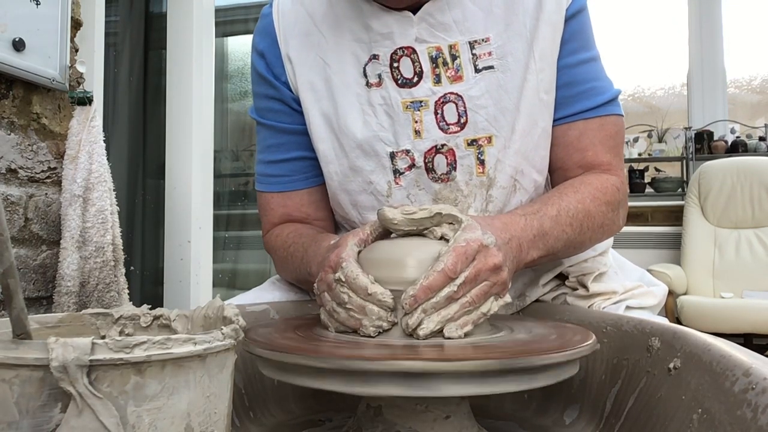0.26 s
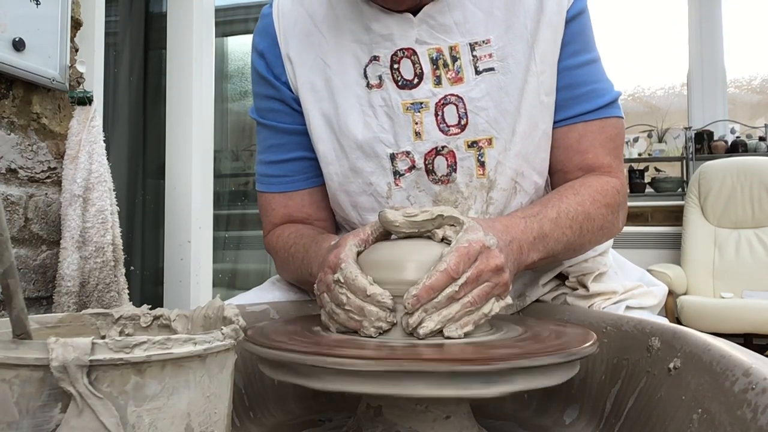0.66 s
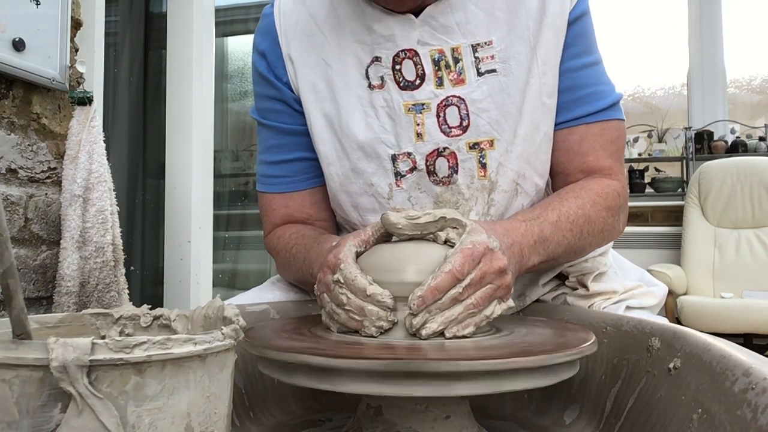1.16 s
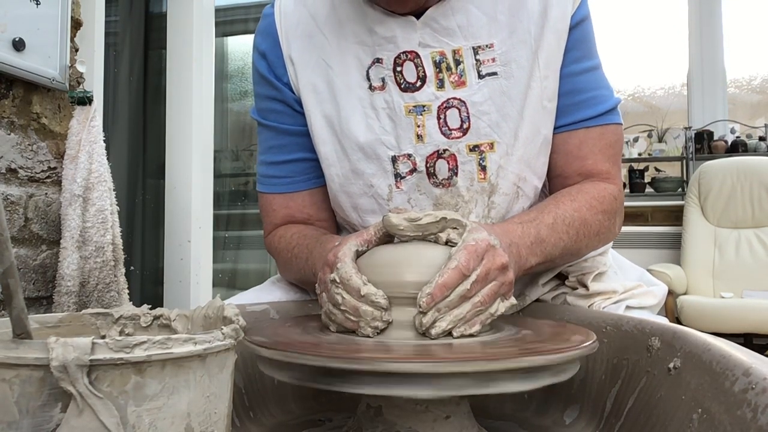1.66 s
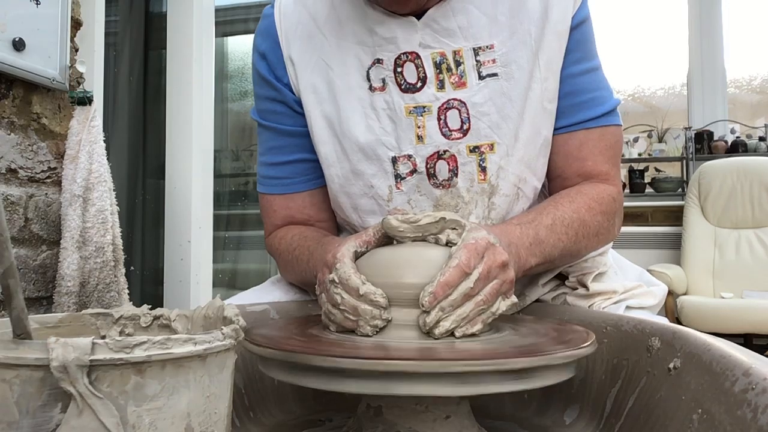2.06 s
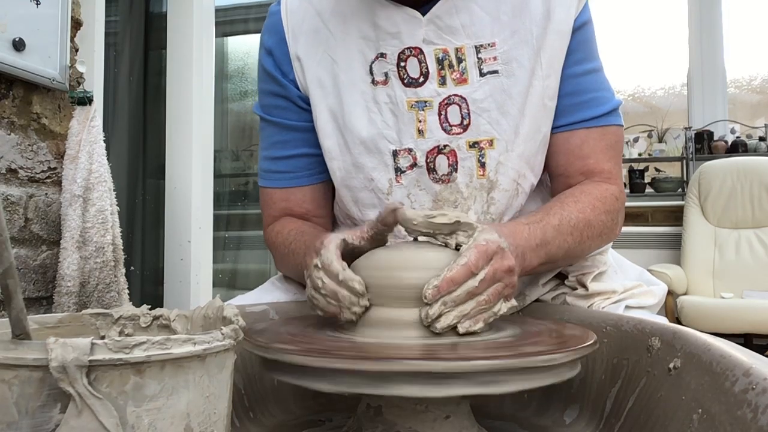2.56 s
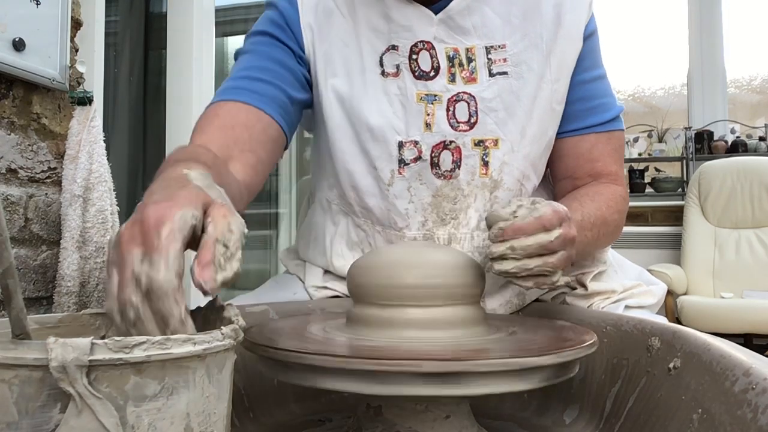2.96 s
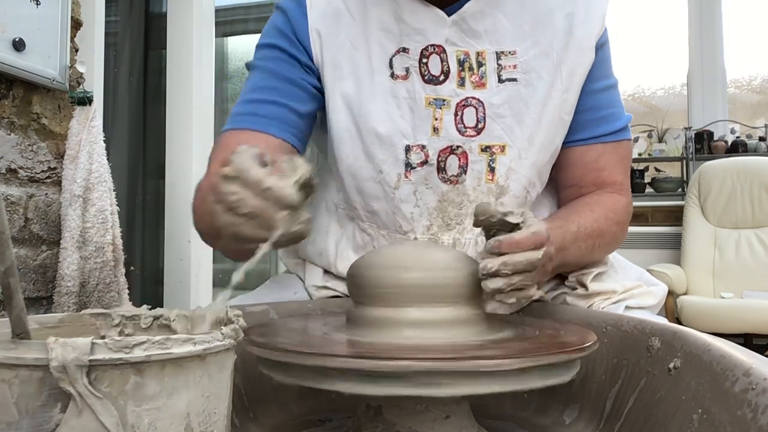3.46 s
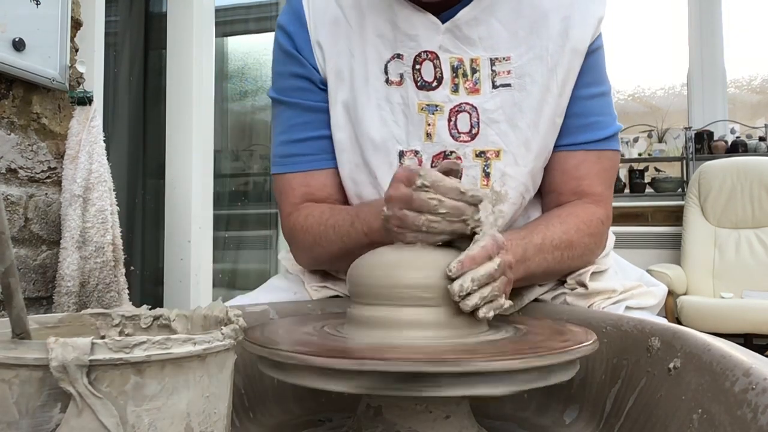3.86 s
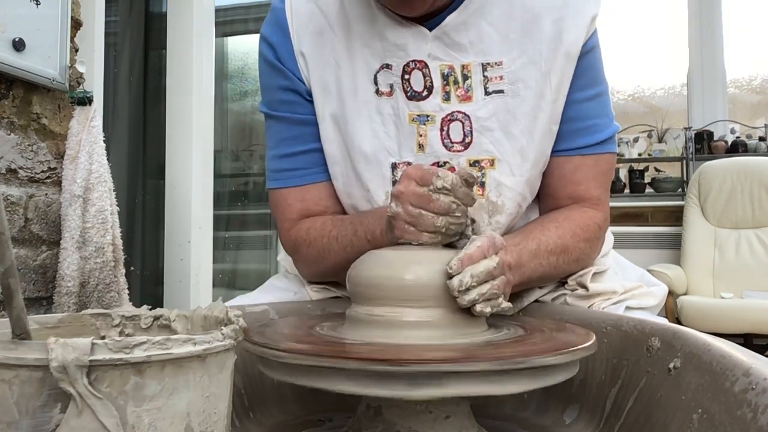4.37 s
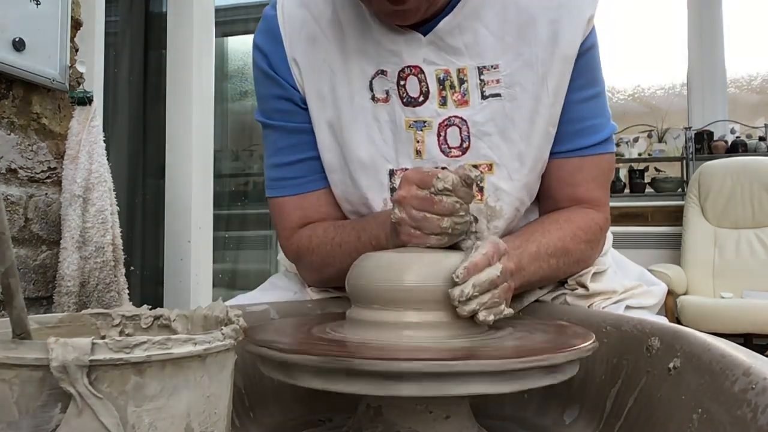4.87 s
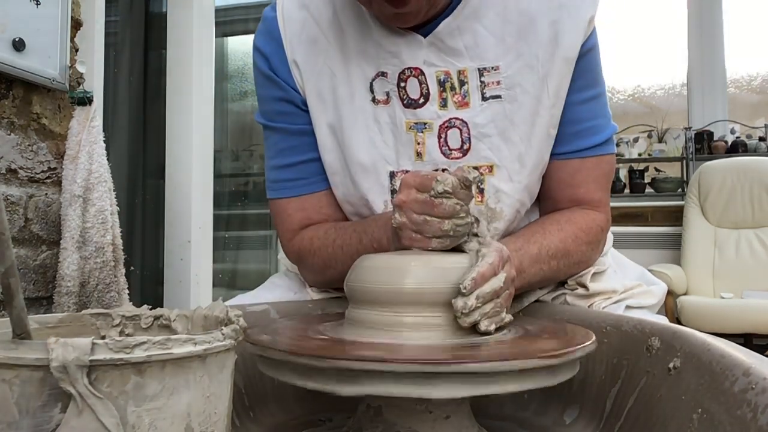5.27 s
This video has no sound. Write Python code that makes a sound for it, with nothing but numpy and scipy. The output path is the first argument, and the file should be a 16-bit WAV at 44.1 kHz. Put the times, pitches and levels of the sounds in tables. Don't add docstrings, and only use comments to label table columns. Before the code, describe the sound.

For about 5.5 seconds an electric potter's wheel runs close to the microphone, in a dry mono pickup. A strong low hum near 100 and 170 hertz, with a weaker 200 hertz tone, stays almost constant, roughened by shaft vibration about eleven times a second; its speed sags imperceptibly around 2 seconds and recovers. Above it sit soft rumble, a faint metallic bearing whir and thin air hiss. From 0.2 to 1.5 seconds, wet clay drags past the palms in five quiet, gritty hisses, roughly 0.3 seconds apart. The rub then settles and fades as one hand leaves near 2.65. At 3.02 a tiny hard flick of slip snaps against the bucket, followed around 3.4 by a brief soft water swish with small ticks. Sparse wet ticks resume at 4.4, thickening after 5 seconds as the light, steady clay hiss returns, the motor still droning at the end.

```python
import sys
import numpy as np
from scipy import signal
from scipy.fft import rfft, irfft, next_fast_len
from scipy.io import wavfile

SR = 44100
rng = np.random.default_rng(int(sys.argv[2]) if len(sys.argv) > 2 else 0)


def to_wav(s):
    ch = np.atleast_2d(s).T
    pcm = np.round(np.clip(ch, -1, 1) * 32767)
    wavfile.write(sys.argv[1], SR, pcm.astype(np.int16))


def attenuation_scalar(level_db):
    decades = np.asarray(level_db, float) / 20
    return 10 ** decades


N = 243873

# time_s, turns_per_s
SHAFT_SPEED = [(0, 10.768), (0.5, 10.766), (1.0, 10.734), (2.0, 10.7), (2.25, 10.709), (2.75, 10.82),
               (3.5, 10.833), (4.0, 10.82), (4.3, 10.795), (5.0, 10.774), (5.53, 10.786)]


def shaft_turns():
    start_turns = .75
    return np.cumsum(in_time(SHAFT_SPEED)) / SR + start_turns


# multiple_of_shaft_speed, level_db (rms)
STRONG_ORDERS = [(6, -58.4), (8, -53.5), (9, -42.6), (10, -43.7), (11, -39.5), (12, -44.5), (13, -49.5),
                 (14, -46.7), (15, -39.7), (16, -27.9), (17, -43.1), (18, -40.6), (19, -50.5), (20, -57.4),
                 (21, -54.0), (22, -43.5), (24, -42.9), (25, -40.9), (26, -54.5), (27, -58.9), (30, -49.6),
                 (31, -52.0), (32, -56.5), (33, -49.5), (34, -59.9), (36, -55.6), (39, -54.8), (41, -56.0),
                 (42, -61.9), (48, -65.1)]


def shaft_orders():
    faint_db, fall_db_per_order = -62, .6
    strong = dict(STRONG_ORDERS)
    return [(k, strong.get(k, faint_db - fall_db_per_order * abs(k - 30))) for k in range(5, 57)]


# multiple_of_twice_mains, level_db (rms)
HUM = [(1, -30.8), (2, -36.3), (3, -55.2), (4, -58.9), (5, -67.2), (6, -71.6)]
# multiple_of_twice_mains, level_db (rms)
WHINE = [(6, -77.5), (26, -81.5), (29, -78)]
# shaft_multiples_from_first_hum_line, level_db (rms)
BESIDE_FIRST_HUM = [(1, -61.9), (2, -48.3), (3, -58.4), (5, -59.8), (6, -49.9), (7, -46.4), (8, -44.6),
                    (9, -45.2), (10, -57.2), (11, -55.9), (12, -60.6), (14, -59.1), (16, -56.8)]
# shaft_multiples_from_second_hum_line, level_db (rms)
BESIDE_SECOND_HUM = [(-9, -54.4), (-8, -56.0), (-7, -49.0), (-4, -61.0), (-3, -54.6), (-2, -53.6),
                     (2, -52.7), (3, -60.9), (9, -61.4), (15, -61.1)]
# pitch_hz, level_db (rms)
ROTOR = [(55.3, -68), (124.83, -53), (175.1, -52), (203.3, -54), (224.8, -51)]
# freq_hz, density_db (per Hz)
RUMBLE = [(30, -29), (46, -29.5), (60, -17.5), (72, -33.5), (100, -14.5), (122, -3), (140, -12.5),
          (175, -0.5), (205, -10.5), (260, -9.5), (320, -11), (600, -20.5), (950, -36.5), (1700, -97)]


def motor(turns):
    magnet_hz, mains_start_cycles, rumble_db = 100.008, .86, -42.5
    t = np.arange(N) / SR
    pull = magnet_hz * t + mains_start_cycles
    lines = tones(HUM, pull, wander_db=.3)
    lines += tones(shaft_orders(), turns, wander_db=.7)
    lines += tones(BESIDE_FIRST_HUM, turns, pull, wander_db=3.0)
    lines += tones(BESIDE_SECOND_HUM, turns, 2 * pull, wander_db=.5)
    lines += tones(ROTOR, t, wander_db=1.0)
    lines += tones(WHINE, pull, wander_db=4.5)
    highpass = signal.butter(4, 620, "high", fs=SR, output="sos")
    grain = signal.sosfilt(highpass, round_turn(turns, count=1024))
    shake = rng.standard_normal(N) + .6 * grain
    return lines + attenuation_scalar(rumble_db) * coloured(shake, RUMBLE)


# pitch_hz, width_hz, level_db
HOUSING = [(598, 14, 7), (760, 30, -2), (955, 60, -7), (1290, 30, -10), (1442, 30, -9), (1825, 30, -8),
           (1924, 24, -1), (1975, 40, -6), (2550, 30, -7), (2615, 40, -7), (2715, 40, -4), (2800, 30, -10),
           (2905, 26, 0), (2950, 40, -4), (3135, 35, -12), (3820, 320, -16), (4110, 120, -17)]


def bearings(turns):
    whir_db, lumps_db, unsteady_db = -60, 1.6, 1.2
    out = np.zeros(N)
    for hz, width_hz, level_db in HOUSING:
        damped_hz = 1.5 * width_hz
        flaws = resonance(round_turn(turns, count=1024), hz, damped_hz)
        grit = resonance(rng.standard_normal(N), hz, damped_hz)
        drive = .9 * rms_one(flaws) + .4 * rms_one(grit)
        load = attenuation_scalar(lumps_db * round_turn(turns, count=12) + unsteady_db * drift(4))
        mode = rms_one(resonance(drive * load, hz, damped_hz))
        out += attenuation_scalar(level_db) * np.sqrt(width_hz) * mode
    return attenuation_scalar(whir_db) * rms_one(out)


# time_s, level_db (rms)
REST = [
    (0, -76.5),
    (1.6, -74.5),
    (2.5, -74.5),
    (2.65, -77),
    (3.0, -80),
    (4.5, -78.5),
    (5.2, -73),
    (5.5, -73),
]
# let_go_s, level_db (rms), held_s
DRAGS = [
    (.27, -67, .04),
    (.55, -63.5, .12),
    (.86, -62, .11),
    (1.16, -61.5, .09),
    (1.48, -61.5, .02),
]


def grip_db():
    drags = [swell(*row, rise_db_per_s=73, fall_db_per_s=139, creep_db_per_s=15) for row in DRAGS]
    return np.max([in_time(REST)] + drags, axis=0)


# freq_hz, density_db (per Hz)
RUB_COLOUR = [(1880, -30.5), (3200, 0), (3490, -8), (4140, -0.5), (4450, -4), (5280, -6), (6780, -5),
              (7290, -11.5), (8540, -8.5), (9940, -10.5), (11000, -5.5), (12500, -14), (13800, -5.5),
              (15500, -23.5)]


def hands():
    grit_db, patchy_db = 1.5, 1.2
    grit = rng.standard_normal(N) * attenuation_scalar(grit_db * rng.exponential(1, N))
    rub = np.zeros(N)
    for k, hz in enumerate(np.geomspace(3300, 15300, num=24)):
        pocket = resonance(grit, hz, .069 * hz)
        rub += (-1) ** k * pocket * attenuation_scalar(patchy_db * drift(8.2))
    return attenuation_scalar(grip_db()) * coloured(rub, RUB_COLOUR)


# pitch_hz, width_hz, level_db
SWISH_PEAKS = [(1980, 250, 1.5), (3000, 250, -4), (4300, 400, -4), (5500, 600, -14)]


def swish():
    start_s, held_s, level_db = 3.36, .18, -62.5
    water = np.zeros(N)
    for hz, width_hz, peak_db in SWISH_PEAKS:
        water += attenuation_scalar(peak_db) * rms_one(resonance(rng.standard_normal(N), hz, width_hz))
    flow_db = swell(start_s + held_s, level_db, held_s, rise_db_per_s=250, fall_db_per_s=140)
    return attenuation_scalar(flow_db) * rms_one(water)


# start_s, peak_db, pitch_hz, width_hz
FLICK = [
    (3.0224, -48, 4100, 1200),
    (3.0247, -45, 3950, 800),
    (3.0249, -54, 5100, 400),
    (3.0268, -55, 4500, 400),
    (3.0295, -58, 5000, 500),
]


def flick():
    out = np.zeros(N)
    click = np.arange(512) == 0
    for start_s, peak_db, hz, width_hz in FLICK:
        snap = resonance(resonance(click, hz, width_hz), hz, 2 * width_hz)
        start = round(start_s * SR)
        out[start:start + 512] += attenuation_scalar(peak_db) * (snap / np.abs(snap).max() + .25 * click)
    return out


# start_s, peak_db, pitch_hz, crack_share (broad crack, 0-1)
TICKS = [(0.064, -54.5, 13600, .4), (0.9595, -53.5, 11000, .5), (1.0646, -55, 7500, .2),
         (3.0215, -55.5, 11020, .8), (3.375, -58, 6900, .5), (3.4472, -55.5, 10700, .1),
         (3.459, -61, 10500, .2), (3.4913, -54, 12900, .6), (3.578, -58.5, 15240, .3),
         (4.3836, -52, 8500, .8), (4.626, -57, 10800, .2), (4.6366, -56, 10600, .6),
         (4.646, -59, 10800, .1), (4.7734, -61.5, 11300, .3), (4.8735, -55, 7050, 0.5),
         (5.0116, -56.5, 10750, .7), (5.0996, -53.5, 6900, 0.5), (5.1096, -54.5, 10900, .5),
         (5.1624, -61.5, 10800, .1), (5.1833, -55.5, 14400, .5), (5.234, -58, 11100, .4),
         (5.2435, -56, 8130, .5), (5.319, -57, 8100, 0.2), (5.3228, -57, 10800, .4),
         (5.3536, -55, 11050, 0), (5.3824, -53, 6700, .4), (5.4074, -59, 10800, .3),
         (5.4498, -53.5, 11700, .8)]


def ticks():
    decay_60db_s, crack_hz, crack_width_hz = .022, 10000, 9000
    size = 2048
    out, t = np.zeros(N + size), np.arange(size) / SR
    for start_s, peak_db, hz, crack_share in TICKS:
        snap = rng.standard_normal(size) + 3 * (t == 0)
        puff = snap * np.exp(-np.log(1000) * t / decay_60db_s)
        ringing = rms_one(resonance(resonance(puff, hz, .13 * hz), hz, .13 * hz))
        crack = rms_one(resonance(puff, crack_hz, crack_width_hz))
        tick = ringing + 2.7 * crack_share * crack
        start = round(start_s * SR)
        out[start:start + size] += attenuation_scalar(peak_db) * tick / np.abs(tick).max()
    return out[:N]


# freq_hz, density_db (per Hz)
AIR = [(590, -32), (1000, -6), (1170, -8), (1400, -5), (1990, -8.5), (2250, -10), (2900, -6), (3350, -17),
       (4090, -16.5), (6000, -17), (8600, -19.5), (11200, -20.5), (13600, -23), (15500, -30.5)]


def air(turns):
    level_db = -62.5 + 1.0 * drift(9.8)
    stir = rng.standard_normal(N) + .5 * round_turn(turns, count=1024)
    return attenuation_scalar(level_db) * coloured(stir, AIR)


def tones(rows, cycles, carrier=0., wander_db=0.):
    out = np.zeros(N)
    for (multiple, level_db), start in zip(rows, rng.random(len(rows))):
        gain = np.sqrt(2) * attenuation_scalar(level_db + wander_db * drift(.86))
        out += gain * np.sin(2 * np.pi * (multiple * cycles + carrier + start))
    return out


def round_turn(turns, count):
    return np.interp(turns % 1 * count, np.arange(count), rng.standard_normal(count), period=count)


def resonance(x, hz, width_hz):
    r = np.exp(-np.pi * width_hz / SR)
    zeros = np.array([1, 0, -1]) * (1 - r * r) / 2
    poles = [1, -2 * r * np.cos(2 * np.pi * hz / SR), r * r]
    return signal.lfilter(zeros, poles, x)


def coloured(white, spectrum):
    size = next_fast_len(N)
    hz, level_db = np.transpose(spectrum)
    log_hz = np.log(np.arange(1, size // 2 + 2) * SR / size)
    gain = attenuation_scalar(np.interp(log_hz, np.log(hz), level_db))
    return rms_one(irfft(rfft(white, size) * gain, size)[:N])


def swell(end_s, level_db, held_s, rise_db_per_s, fall_db_per_s, creep_db_per_s=0.):
    before_s = end_s - np.arange(N) / SR
    creep_db = creep_db_per_s * np.clip(before_s, 0, held_s)
    rise_db = rise_db_per_s * np.maximum(before_s - held_s, 0)
    fall_db = fall_db_per_s * np.minimum(before_s, 0)
    return level_db - creep_db - rise_db + fall_db


def drift(rate_hz):
    hop = 40
    r = np.exp(-2 * np.pi * rate_hz * hop / SR)
    white = rng.standard_normal(N // hop + 2002)
    slow = signal.lfilter([1], [1, -2 * r, r * r], white)[2000:]
    return np.interp(np.arange(N) / hop, np.arange(len(slow)), rms_one(slow))


def in_time(rows):
    return np.interp(np.arange(N) / SR, *np.transpose(rows))


def rms_one(x):
    return x / np.sqrt(np.mean(x ** 2) + 1e-20)


def scene():
    turns = shaft_turns()
    wheel = motor(turns) + bearings(turns)
    clay = hands() + swish() + flick() + ticks()
    return (wheel + clay + air(turns))[None]


def roll_off(x):
    return signal.sosfilt(signal.butter(12, 15610, fs=SR, output="sos"), x)


def record(dry):
    return roll_off(dry)


dry = scene()
out = record(dry)
to_wav(out)
```